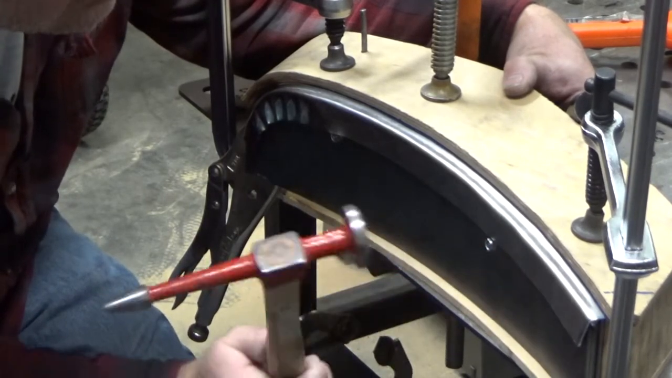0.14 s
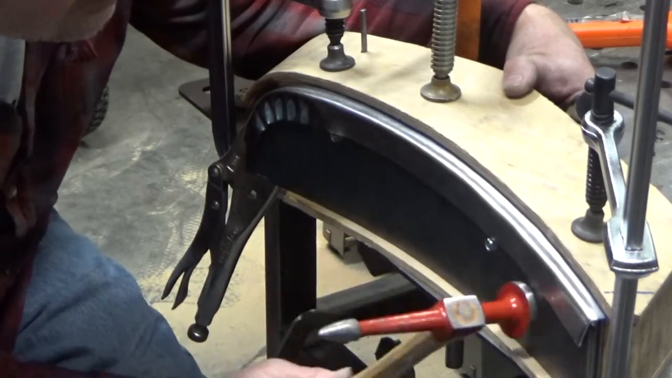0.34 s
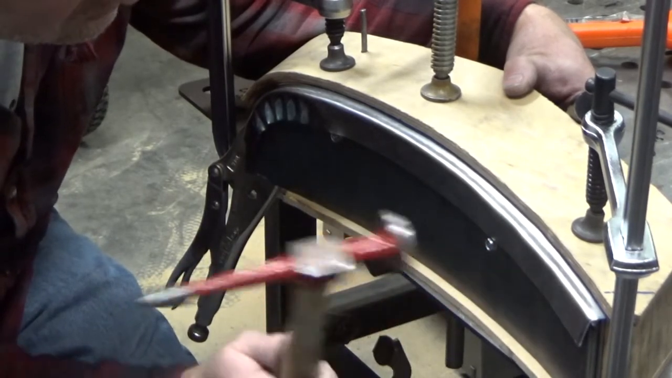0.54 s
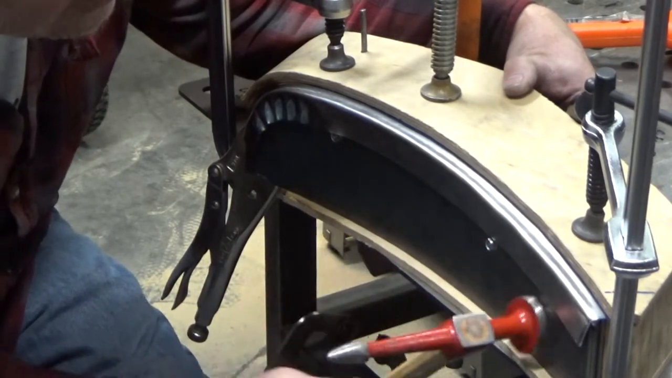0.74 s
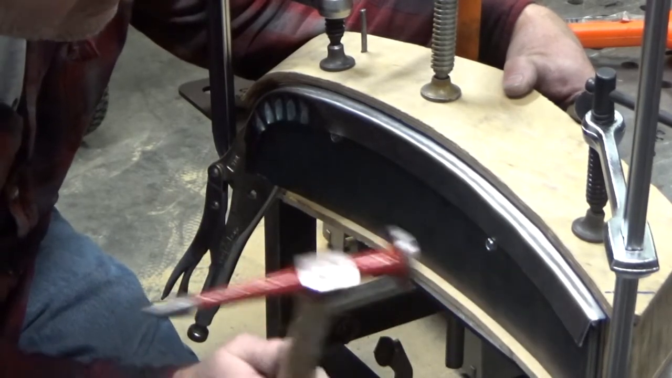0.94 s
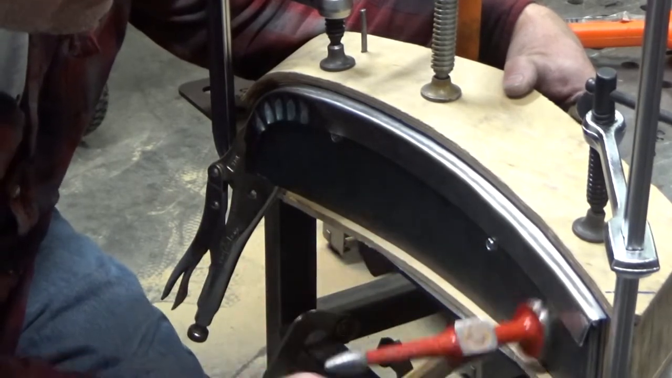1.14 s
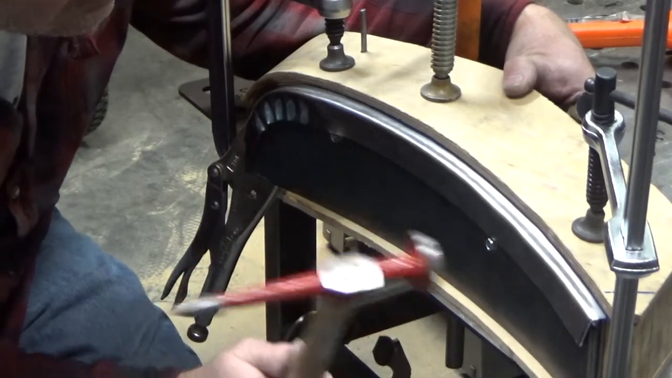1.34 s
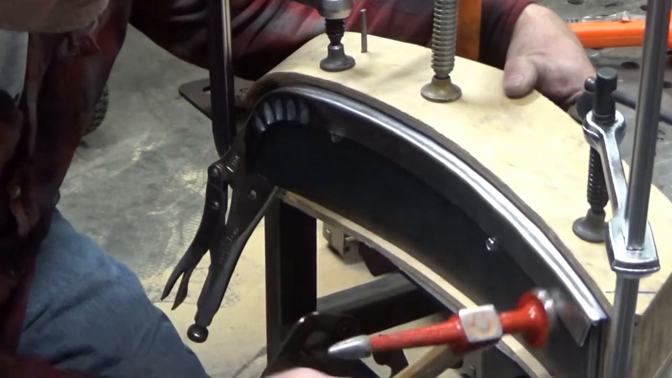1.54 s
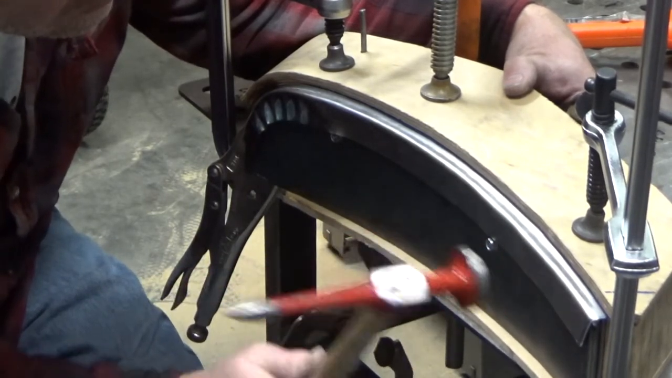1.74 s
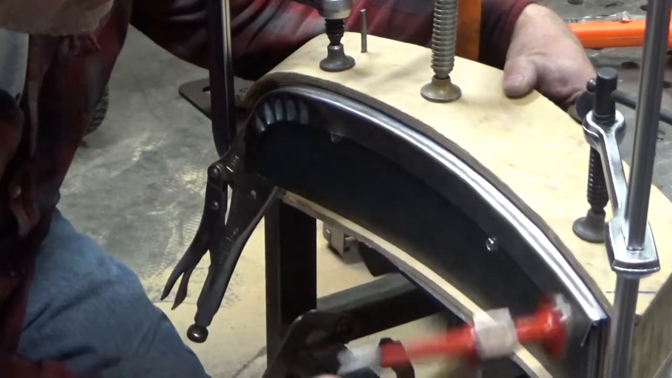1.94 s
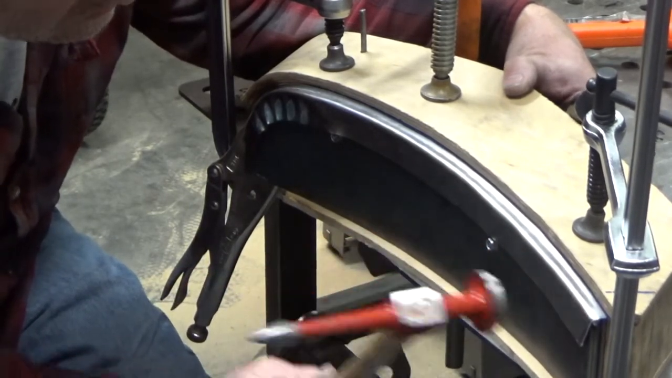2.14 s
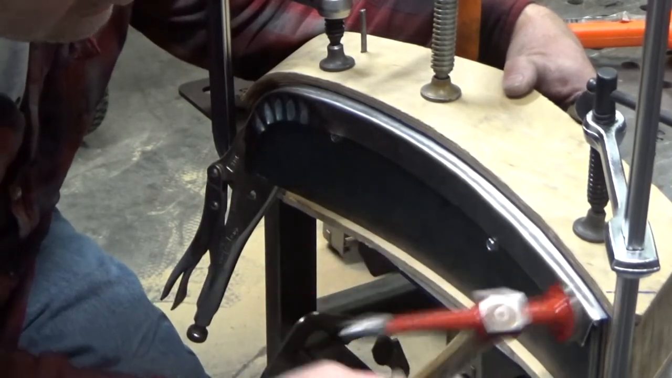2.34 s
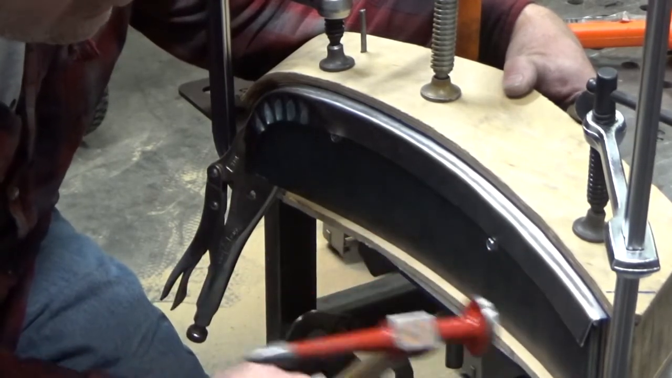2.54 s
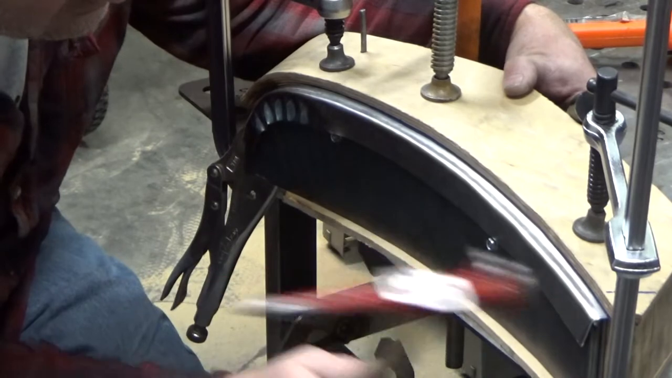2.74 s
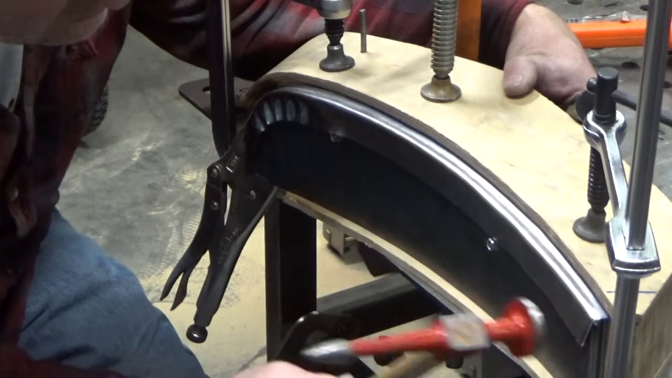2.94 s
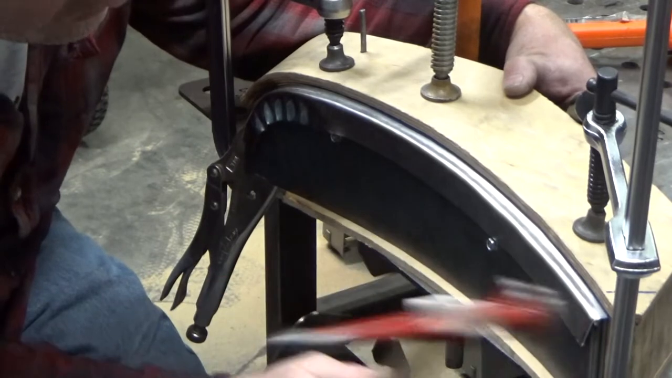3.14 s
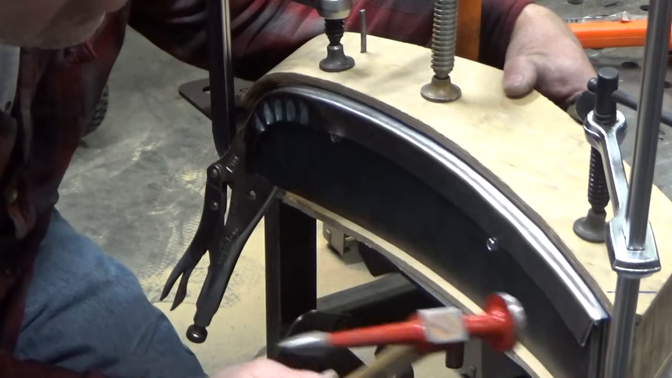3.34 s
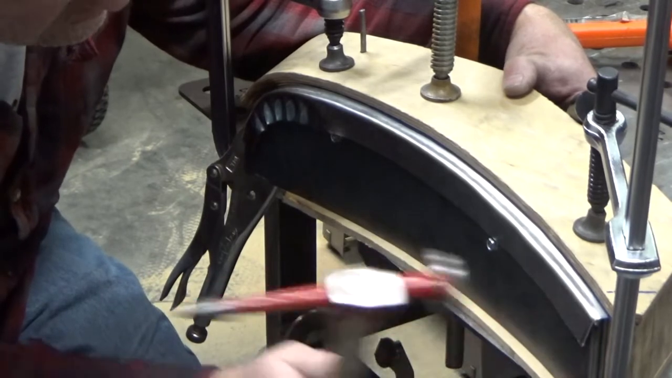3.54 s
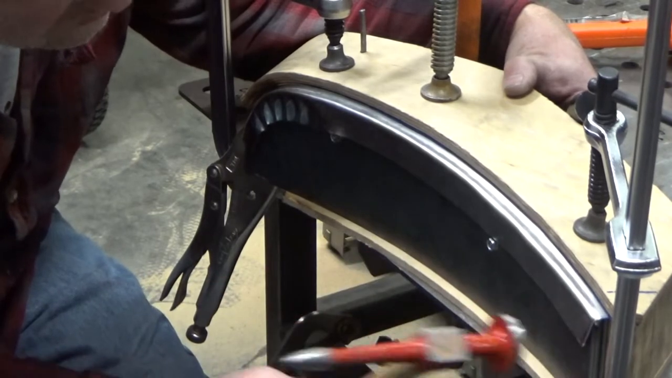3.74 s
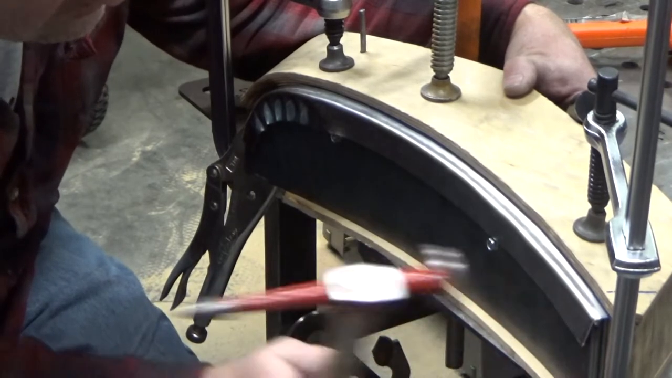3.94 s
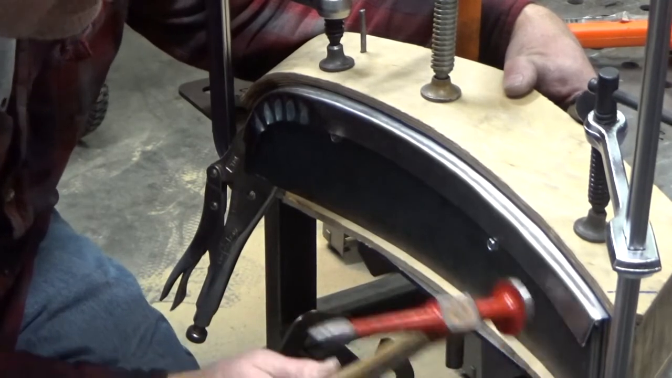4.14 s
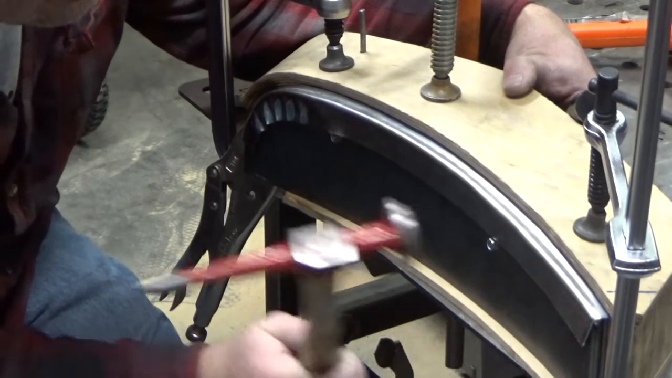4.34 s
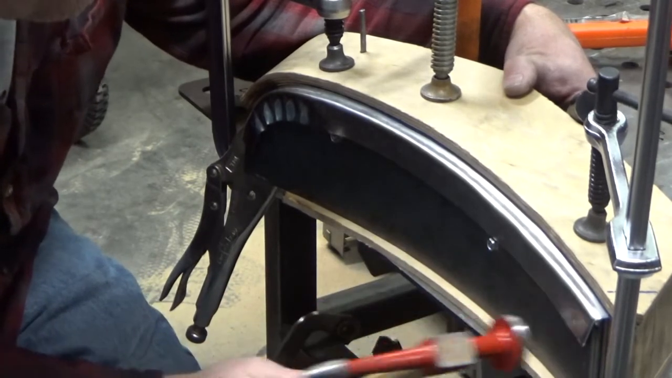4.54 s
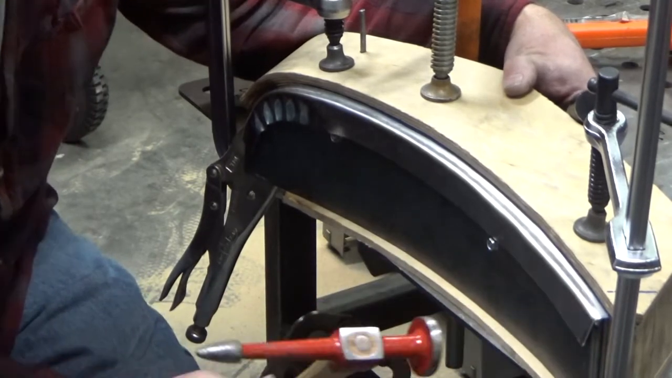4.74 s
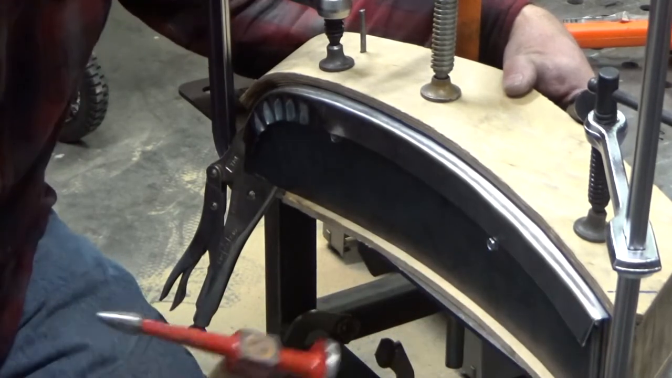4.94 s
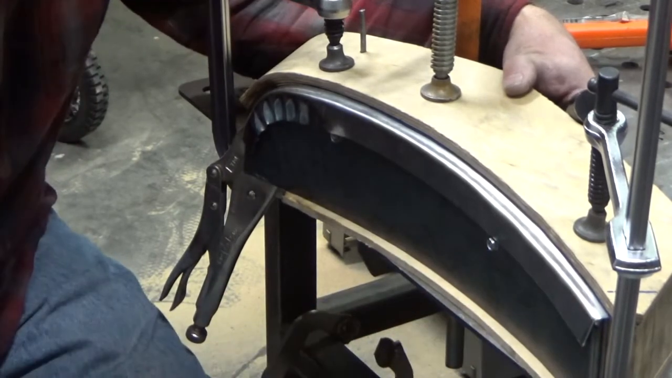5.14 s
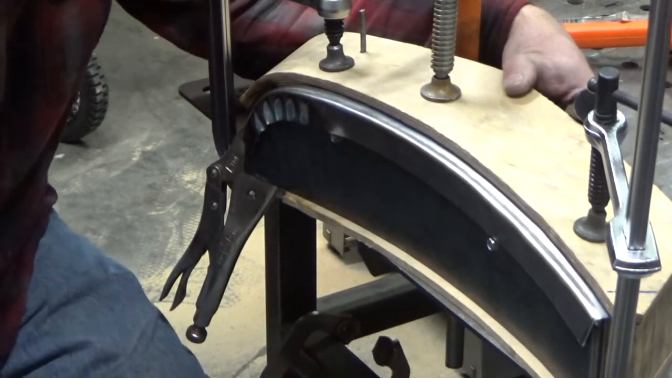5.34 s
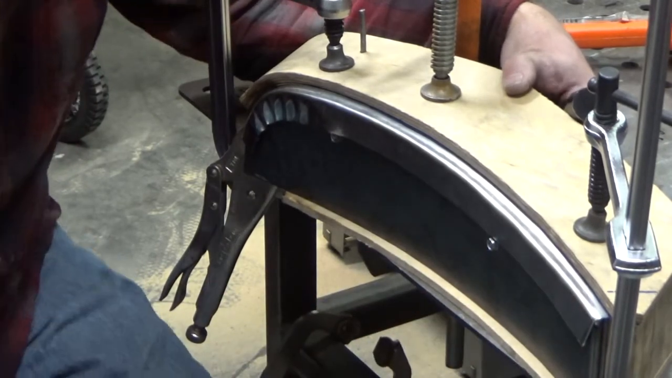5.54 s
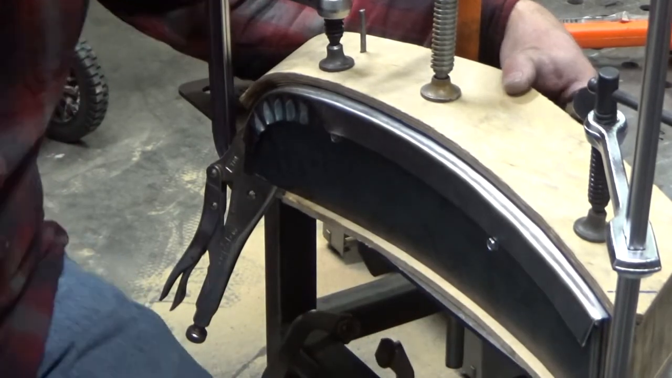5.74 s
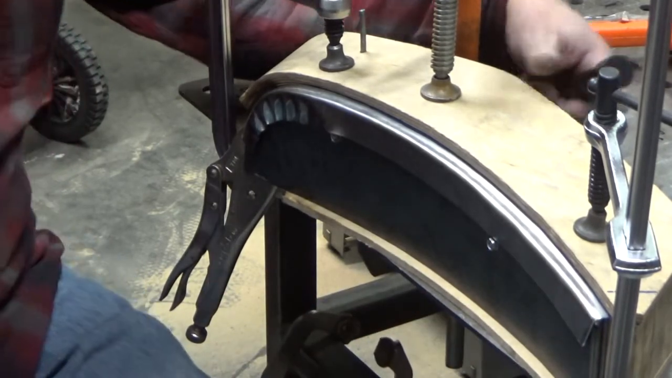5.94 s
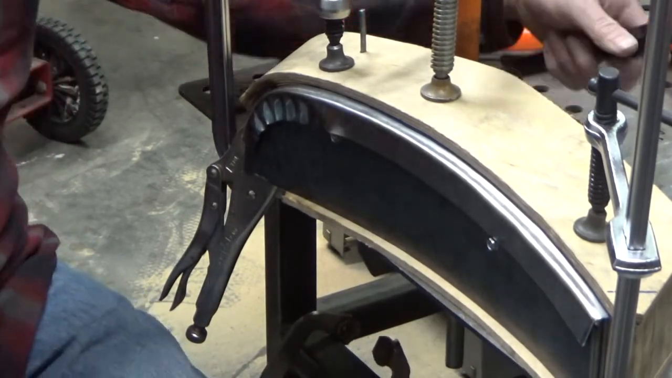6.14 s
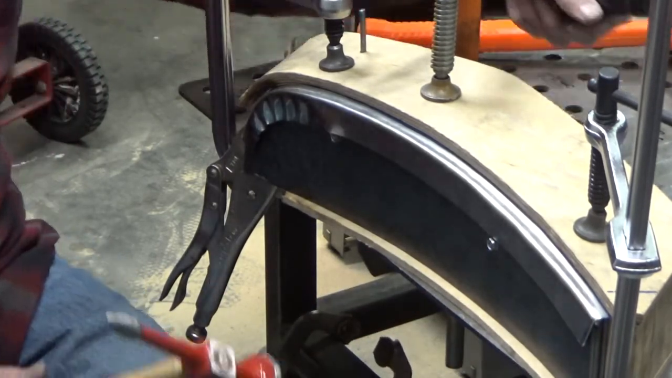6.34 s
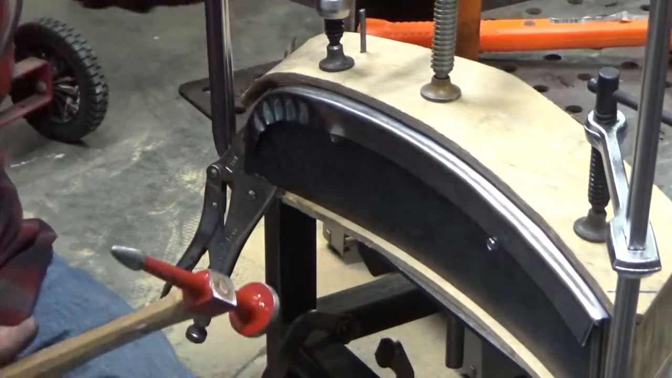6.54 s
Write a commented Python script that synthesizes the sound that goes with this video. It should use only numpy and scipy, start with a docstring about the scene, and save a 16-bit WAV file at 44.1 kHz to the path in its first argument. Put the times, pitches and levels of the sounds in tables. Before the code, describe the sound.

Loud sharp metallic whacks on sheet steel, just over two a second, with a faint sustained hammer-head ring, ending in cloth rustle and tool clinks.

```python
"""Thirteen crashes of a body hammer on a thin steel panel clamped on a wooden form, in a hard-walled garage.
Each is filtered noise with a diffuse room tail, held down by a limiter; the head sings on as decaying sines.
Afterwards a hand shifts on the form (thuds and clinks), a sleeve rustles (swelling noise)
and a tool is set down on the bench (damped modes). Mains hum and a faint hiss lie beneath."""
import sys
import numpy as np
from scipy import signal
from scipy.fft import rfft, irfft, next_fast_len
from scipy.io import wavfile
from scipy.ndimage import uniform_filter1d, minimum_filter1d, map_coordinates

SR = 44100
rng = np.random.default_rng(int(sys.argv[2]) if len(sys.argv) > 2 else 0)


def to_wav(s):
    """Save 16-bit WAV."""
    ch = np.atleast_2d(s).T  # columns
    pcm = np.round(np.clip(ch, -1, 1) * 32767)  # PCM
    wavfile.write(sys.argv[1], SR, pcm.astype(np.int16))


N = 294588

# Hammer blows. Each row: start in s, relative force in dB, brightness in dB per octave, resonance of the
# struck spot in Hz, its strength in dB, relative ping of the hammer face in dB, relative ring of the head in dB.
HAMMER_BLOWS = [(-0.025, 4, 0, 3450, 2, -3, -25), (0.3988, 1.9, -0.46, 2940, 1, -17, -26),
                (0.815, 1.9, 0, 3320, 1.5, -22, -28.5), (1.2512, 1.4, 0.5, 4000, 2, -0.5, -26.5),
                (1.671, 2, 0.2, 6500, 1.9, -3, -27), (2.071, 2, 1, 4300, 4.5, 0, -29),
                (2.506, 2, 1.75, 6860, 1, -2, -29), (2.9227, 0.5, 1, 7100, 1, -7, -26),
                (3.3495, 0.2, 0.5, 2500, 1, -2.5, -23.5), (3.742, -0.3, -0.5, 10100, 1, 1, -34.5),
                (4.1702, 1.2, -0.46, 9450, 4, 1.5, -24.5), (4.5683, 2.5, 0.15, 5200, 1.5, -3, -30),
                (4.9855, 0.5, 0.1, 10900, -1.5, 5, -36.5)]


def amp(db):
    """Decibels to amplitude ratio."""
    return 10 ** (np.asarray(db) / 20)


def unit(x):
    """Scale to rms 1."""
    return x / np.sqrt(np.mean(x ** 2) + 1e-20)


def along(points, hz):
    """Interpolate (Hz, value) points on a log-frequency axis."""
    point_hz, values = np.transpose(points)
    return np.interp(np.log(hz + 1), np.log(point_hz + 1), values)


def seconds():
    """The 1 s time axis of one event."""
    return np.arange(SR) / SR


def fade(t, t60):
    """Exponential decay: 60 dB in t60 s."""
    return np.exp(-np.log(1000) * t / t60)


def bell(t, centre_s, width_s):
    """A smooth bump in time, of height 1."""
    return np.exp(-((t - centre_s) / width_s) ** 2)


def hump(hz, centre_hz, octaves):
    """A bell of height 1 on the log-frequency axis."""
    return np.exp(-.5 * (np.log2((hz + 1) / centre_hz) / octaves) ** 2)


def peak(hz, centre_hz, width_hz):
    """A resonance bump of height 1."""
    return 1 / (1 + (2 * (hz - centre_hz) / width_hz) ** 2)


def bumps(resonances, hz):
    """The dB that (Hz, width Hz, dB) resonances add to a spectrum."""
    return sum(db * peak(hz, centre_hz, width_hz) for centre_hz, width_hz, db in resonances)


def wobble(rate):
    """A smooth random curve, rate knots a second."""
    knots = rng.standard_normal(N // 100)
    return map_coordinates(knots, [np.arange(N) * rate / SR], mode="mirror")


def coloured(x, gain):
    """Causal minimum-phase filter with the given gain of frequency, keeping the power of white noise."""
    m = 2 * next_fast_len(x.shape[-1])
    gains = np.maximum(unit(gain(np.fft.rfftfreq(m, 1 / SR))), 1e-6)
    # folding the cepstrum makes the phase minimal
    cepstrum = irfft(np.log(gains))
    cepstrum[1:m // 2] *= 2
    cepstrum[m // 2 + 1:] = 0
    response = np.exp(rfft(cepstrum))
    return irfft(rfft(x, m) * response, m)[..., :x.shape[-1]]


def diffuse(n):
    """White noise arriving from all sides at two close capsules: the side is weaker than the mid."""
    # Each row: frequency in Hz, side minus mid in dB.
    side_spectrum = [(60, -20), (150, -25.5), (300, -16), (600, -14), (1000, -7), (5000, -8.5), (9000, -7),
                     (12000, -44.5)]
    mid, side = rng.standard_normal((2, n))
    side_gain = amp(along(side_spectrum, np.fft.rfftfreq(n, 1 / SR)))
    side = irfft(rfft(side) * side_gain, n)
    return np.array([mid + side, mid - side])


def rush(spectrum):
    """Steady stereo noise of rms 1 with the given spectrum."""
    return unit(coloured(diffuse(N), lambda hz: amp(along(spectrum, hz))))


def burst(t60, wet_db, gap_s=.003, build_s=0.013, low_hz=500):
    """A short shake heard directly, then the walls' diffuse answer, whose treble dies first."""
    # Each row: frequency in Hz, reverberation t60 in s.
    room_decay = [(120, 0.54), (300, 0.6), (800, 0.63), (2000, 0.55), (4500, 0.54), (8500, 0.38),
                  (13000, 0.26)]
    t = seconds()
    # low notes radiate poorly and mostly come by way of the room
    highpass = signal.butter(1, low_hz, "high", fs=SR)
    direct = signal.lfilter(*highpass, rng.standard_normal(SR)) * fade(t, t60)
    hz, age_s, bins = signal.stft(diffuse(SR), SR, nperseg=256)
    decay = fade(age_s, along(room_decay, hz)[:, None])
    tail = signal.istft(bins * decay, SR, nperseg=256)[1][:, :SR]
    onset = 1 - np.exp(-np.maximum(t - gap_s, 0) / build_s)
    return direct + amp(wet_db) * tail * onset


def ring(modes):
    """Damped sine modes at randomly varied levels."""
    t = seconds()
    return sum(amp(db + rng.standard_normal()) * fade(t, t60) * np.sin(2 * np.pi * hz * t)
               for hz, db, t60 in modes)


def add(track, s, sound):
    """Mix a sound into the track at s seconds; what falls outside is cut."""
    start = round(s * SR)
    part = sound[:, max(-start, 0):N - start]
    track[:, max(start, 0):][:, :part.shape[1]] += part


def background(hum_db=-1, air_db=-1):
    """Mains hum as three harmonics over a faint noise hiss; both follow one slow level curve."""
    # Each row: harmonic number, relative level in dB.
    harmonics = [(1, -2), (2, -13), (3, -5.5)]
    # Each row: time in s, common level in dB before the hum and air offsets.
    level_points = [(0, -64.5), (5.35, -57), (5.6, -59.5), (5.95, -59.5), (6.2, -57), (6.68, -54)]
    # Each row: frequency in Hz, relative density in dB.
    air_spectrum = [(25, -9.5), (70, -9), (180, -6.5), (400, -5.5), (900, -6), (2000, -6.5), (5000, -13.5),
                    (9000, -18), (14500, -28.5), (15400, -50)]
    t = np.arange(N) / SR
    cycles = 119.8 * t  # fundamental in Hz
    hum = np.sqrt(2) * sum(amp(db) * np.sin(2 * np.pi * (round(k) * cycles + rng.random()))
                           for k, db in harmonics)
    level_db = np.interp(t, *np.transpose(level_points))
    return amp(level_db) * (amp(hum_db) * hum + amp(air_db) * rush(air_spectrum))


def sleeve(catch_rate=55, catch_db=1.5, swish_db=-7.5):
    """Cloth strokes swell and die away; catch and slip make the dull rub and the hiss uneven."""
    # Each row: time of the strongest rub in s, level in dB, rise in s, release in s.
    strokes = [(6.03, -53, 0.04, 0.15), (6.21, -48, 0.085, 0.27), (6.43, -39.5, 0.026, 0.089)]
    # Each row: frequency in Hz, relative density in dB.
    rub_spectrum = [(25, -19), (60, -5), (200, -8.5), (360, 1.5), (500, -9.5), (1200, -12.5), (3000, -46)]
    # Each row: frequency in Hz, relative density in dB.
    swish_spectrum = [(300, -22), (1000, -2), (2800, -1), (3900, 3), (4900, -10), (10000, -7.5),
                      (14500, -28), (15400, -50)]
    t = np.arange(N) / SR
    drag = np.zeros(N)
    for s, db, rise_s, release_s in strokes:
        swell = bell(t, s, rise_s)
        release = np.exp(-np.abs(t - s) / release_s)
        drag += amp(db) * np.where(t < s, swell, release)
    rub = amp(catch_db * wobble(catch_rate)) * rush(rub_spectrum)
    swish = amp(swish_db + catch_db * wobble(catch_rate)) * rush(swish_spectrum)
    return drag * (rub + swish)


def handling(thud_octaves=0.45, clink_octaves=0.78, tool_down_s=6.472, tool_db=-43):
    """Soft contacts: a dull thud of form or bench, a light clink of steel and the set-down tool's ring."""
    # Each row: start in s, relative thud in dB, thud centre in Hz, relative clink in dB, clink centre in Hz,
    # t60 of the direct sound in s.
    knocks = [(5.996, -46.5, 327, -48, 3170, 0.31), (6.076, -46, 280, -50, 4000, 0.072),
              (6.189, -38, 284, -52, 4500, 0.41), (6.283, -54, 330, -37, 2800, 0.079),
              (6.398, -60, 201, -49, 6550, .1), (6.41, -32, 164, -40.5, 1700, 0.24),
              (6.434, -32, 135, -44, 3000, 0.13), (6.472, -44, 600, -41, 2490, 0.5),
              (6.522, -39, 900, -40.5, 2530, 0.091), (6.613, -43, 710, -45.5, 2500, 0.074)]
    # Clamp resonances. Each row: frequency in Hz, width in Hz, boost in dB.
    clamp_modes = [(1690, 110, 11.5), (2150, 140, 8.5), (2420, 130, 9), (2640, 50, 11), (3290, 40, 9.5),
                   (3690, 64, 14), (4130, 48, 5)]
    # Each row: frequency in Hz, relative level in dB, t60 in s.
    tool_modes = [(1071, -7, .4), (1120, 0, .5), (5270, -7, .35), (5292, -2, .4)]
    out = np.zeros((2, N))
    for s, thud_db, thud_hz, clink_db, clink_hz, t60 in knocks:
        push = burst(t60, wet_db=-15, low_hz=80)
        thud = coloured(push, lambda hz: hump(hz, thud_hz, thud_octaves) + 0.0012)
        steel = lambda hz: (hump(hz, clink_hz, clink_octaves) + .003) * amp(bumps(clamp_modes, hz))
        clink = coloured(burst(t60, wet_db=-5.0), steel)
        add(out, s, amp(thud_db) * thud + amp(clink_db) * clink)
    add(out, tool_down_s, amp(tool_db) * ring(tool_modes)[None])
    return out


def hammer_song(song_db=1.0, doppler=0.0012, swing_rate=7, sway_db=3, waver_db=0.6):
    """Each blow sets the head ringing anew; the swing shades the ring and bends its pitch slightly."""
    # Each row: frequency in Hz, relative level in dB.
    head_modes = [(1933.3, 0), (8960, -34)]
    # The head turns away as the hammer is lowered. Each row: time in s, width in s, dip in dB.
    lowering = [(5.35, 0.07, 17), (5.73, 0.029, 11), (5.93, 0.057, 16)]
    head_t60_s = 4.04  # the free head rings long
    closing_width_s, closing_dip_db = 0.013, 9  # the ring thins as the head closes on the panel
    # top of the backswing: the head faces away
    turn_after_s, turn_width_s, turn_dip_db = 0.264, 0.022, 8.5
    stowed_s, stowed_over_s, stowed_db = 5.9, 0.046, 5.5  # rests behind the knee, quieter
    t = np.arange(N) / SR
    strength, shade_db = np.zeros(N), np.zeros(N)
    for s, *_, ring_db in HAMMER_BLOWS:
        fresh_ring = amp(ring_db) * fade(np.abs(t - s), head_t60_s)
        strength = np.where(t >= s, fresh_ring, strength)
        shade_db += closing_dip_db * bell(t, s, closing_width_s)
        shade_db += turn_dip_db * bell(t, s + turn_after_s, turn_width_s)
    for s, width_s, dip_db in lowering:
        shade_db += dip_db * bell(t, s, width_s)
    shade_db += stowed_db * (1 + np.tanh((t - stowed_s) / stowed_over_s)) / 2
    bent_time_s = np.cumsum(1 + doppler * wobble(swing_rate)) / SR
    tone = sum(amp(db) * np.sin(2 * np.pi * hz * bent_time_s) for hz, db in head_modes)
    # standing waves make the ring waver, differently at the two capsules
    common_db = waver_db * wobble(2 * swing_rate)
    opposed_db = np.array([[1], [-1]]) * sway_db * wobble(swing_rate)
    return strength * amp(song_db - shade_db + common_db + opposed_db) * tone


def hammering(blow_db=-6, face_db=-13, face_t60=0.29, tick_db=-12):
    """Each blow shakes the sheet's dense modes, pings the hammer face and ticks steel on steel."""
    # The sheet's countless modes. Each row: frequency in Hz, relative density in dB.
    crash_spectrum = [(40, -38.5), (95, -30), (140, -15.5), (215, -19.5), (300, -7.5), (520, -10),
                      (730, -2.5), (1300, -3.5), (2200, -2), (4200, -4), (6800, -5.5), (9600, -5.5),
                      (11800, -14.5), (14600, -23.5), (16000, -40)]
    # Resonances of the clamped panel, with the hammer head's overtone in the last row. Each row: frequency in
    # Hz, width in Hz, boost over the crash in dB.
    panel_modes = [(361, 14, 6), (690, 28, 3), (854, 20, 3), (1046, 60, 3), (1408, 26, 5), (1774, 26, 2),
                   (2466, 24, 2), (3400, 26, 2), (3690, 26, 2), (4052, 36, 2), (8960, 36, 5)]
    face_hz, face_width_hz = 10155, 45
    pivot_hz, spot_octaves = 2000, .25
    tick_t60_s, tick_hz, tick_octaves = 0.015, 10960, 0.39
    out, t = np.zeros((2, N)), seconds()
    for s, force_db, bright_db, spot_hz, spot_db, ping_db, _ in HAMMER_BLOWS:
        def crash_gain(hz):
            """A harder contact is brighter; each spot of the sheet favours its own band."""
            contact_db = bright_db * np.log2(1 + hz / pivot_hz) + spot_db * hump(hz, spot_hz, spot_octaves)
            return amp(along(crash_spectrum, hz) + bumps(panel_modes, hz) + contact_db)

        shake = burst(t60=0.084, wet_db=2.5, gap_s=0.00067, build_s=0.018, low_hz=500)
        crash = coloured(shake, crash_gain)
        # reflections blur the ping into a narrow band
        ping = coloured(diffuse(SR), lambda hz: peak(hz, face_hz, face_width_hz)) * fade(t, face_t60)
        tick = coloured(diffuse(SR) * fade(t, tick_t60_s), lambda hz: hump(hz, tick_hz, tick_octaves) + .001)
        blow = crash + amp(face_db + ping_db) * ping + amp(tick_db) * tick
        add(out, s, amp(blow_db + force_db) * blow)
    return out


def limiter(x, ceiling_db, release_db_per_s, size=45):
    """The gain drops just ahead of each peak and recovers at a steady rate; size in samples."""
    level_db = 20 * np.log10(np.abs(x).max(axis=0) + 1e-9)
    over_db = np.maximum(level_db - ceiling_db, 0)
    recovery_db = release_db_per_s * np.arange(N) / SR
    gain_db = recovery_db - np.maximum.accumulate(over_db + recovery_db)
    return x * amp(uniform_filter1d(minimum_filter1d(gain_db, size), size))


def scene():
    """All layers summed."""
    return background() + sleeve() + handling() + hammer_song() + hammering()


def record(dry):
    """Limit the blows, then low-pass steeply at 16 kHz."""
    held = limiter(dry, ceiling_db=-4.0, release_db_per_s=136.5)
    lowpass = signal.butter(24, 16000, fs=SR, output="sos")
    return signal.sosfilt(lowpass, held)


dry = scene()
out = record(dry)
to_wav(out)
```